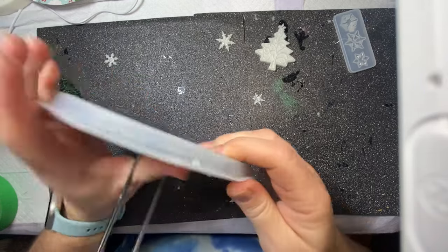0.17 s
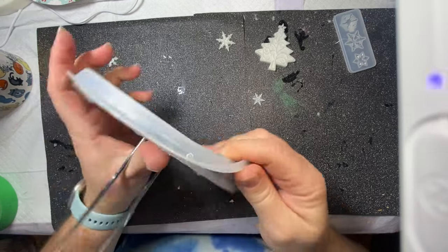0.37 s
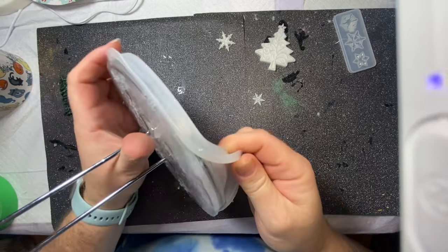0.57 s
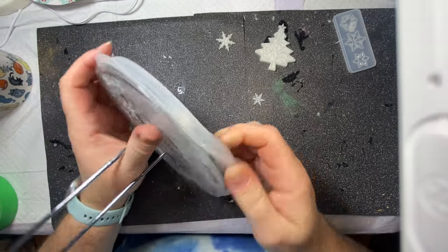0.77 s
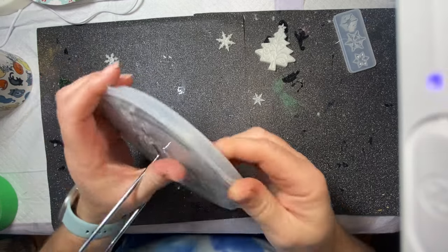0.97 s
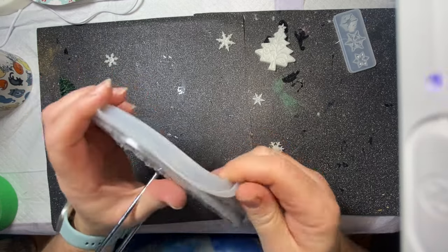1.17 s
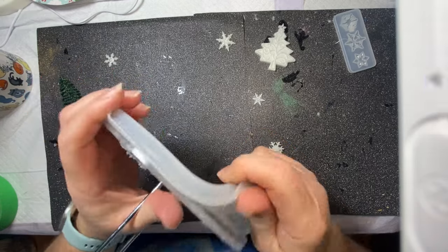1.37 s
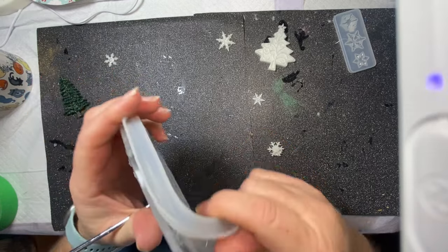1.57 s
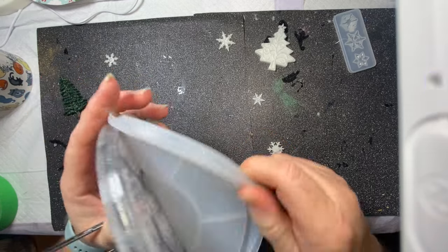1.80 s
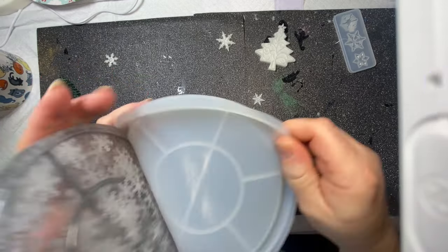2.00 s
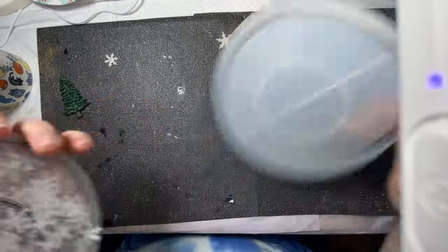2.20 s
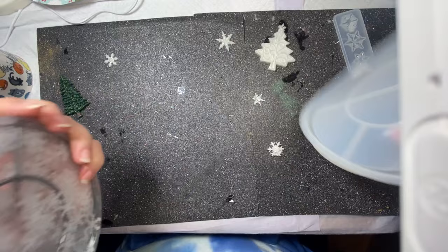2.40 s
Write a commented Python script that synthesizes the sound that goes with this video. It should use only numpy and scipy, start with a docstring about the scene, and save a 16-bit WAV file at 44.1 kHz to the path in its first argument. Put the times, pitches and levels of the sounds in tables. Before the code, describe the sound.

A flexible silicone mold peels off a hard casting, heard close in a quiet, lightly hissing room. Small clicks open, with a sharper crackle at 0.4 s and sparse ticks until a strong snap near 1.04 s. Pops and a short rasp gather at 1.25-1.45 s, thicken from 1.7 s, and peak around 2.04-2.08 s with hollow knocks, fizz and rubbery thuds. Faint ticks remain until about 2.45 s.

```python
"""A silicone mold is bent and peeled off a hard casting, close by in a quiet room.
Its seal lets go in snaps: noise cracks, short sagging rings, a hollow knock and noise through resonances.
Between them the seam fizzes and rasps with random grains; the bending rubber thuds in low noise
and thumps in falling sines. Quick reflections, wall tails, faint hum, rumble and hiss surround it."""
import sys
import numpy as np
from scipy import signal
from scipy.fft import rfft, irfft, next_fast_len
from scipy.io import wavfile
from scipy.ndimage import uniform_filter1d, map_coordinates

SR = 44100
rng = np.random.default_rng(int(sys.argv[2]) if len(sys.argv) > 2 else 0)


def wav_out(sig):
    """Save sig, one row per channel (or a flat mono array), as 16-bit PCM at SR to the path in sys.argv[1]."""
    wavfile.write(sys.argv[1], SR, np.round(np.clip(np.atleast_2d(sig).T, -1, 1) * 32767).astype(np.int16))


N = 108045


def amp(db):
    """Decibels to a linear gain."""
    return 10 ** (np.asarray(db) / 20)


def unit(x):
    """Scale a signal to rms 1."""
    return x / np.sqrt(np.mean(x ** 2) + 1e-20)


def along(points, hz):
    """Read (f/Hz, value) points at any frequency, on a log axis."""
    f, v = np.transpose(points)
    return np.interp(np.log(hz + 1), np.log(f + 1), v)


def curves(rows):
    """One value per sample for each column after the time."""
    s, *cols = np.transpose(rows)
    return [np.interp(np.arange(N) / SR, s, c) for c in cols]


def wobble(rate):
    """A smooth random curve with this many knots a second."""
    knots = rng.standard_normal(int(N * rate / SR) + 4)
    return map_coordinates(knots, [np.arange(N) * rate / SR])


def filtered(x, response):
    """Filter x by a complex response of frequency."""
    m = next_fast_len(N + SR // 2)
    spectrum = rfft(x, m) * response(np.fft.rfftfreq(m, 1 / SR))
    return irfft(spectrum, m)[..., :N]


def coloured(x, spectrum):
    """Shape x by a spectrum closed with -60 dB an octave beyond each end, then set rms 1."""
    below = [(spectrum[0][0] / 2, -60)]
    above = [(spectrum[-1][0] * 2, -60)]
    closed = below + list(spectrum) + above
    return unit(filtered(x, lambda hz: amp(along(closed, hz))))


def glide(t, start_hz, end_hz, fall_s):
    """A sine whose pitch settles exponentially from start to end."""
    pitch_hz = end_hz + (start_hz - end_hz) * np.exp(-t / fall_s)
    return np.sin(2 * np.pi * np.cumsum(pitch_hz) / SR)


def shape(t, rise_s, t60_s):
    """Soft rise, exponential fall of 60 dB in t60."""
    return (1 - np.exp(-t / rise_s)) ** 2 * amp(-60 * t / t60_s)


def grains():
    """Clumps of tiny releases over a smooth hiss: white noise with a grainy level."""
    per_s, spread_db, clump_fall_s = 1500, 4.5, 0.0011
    smooth, wobble_db = 1.1, 3  # steady share beside the clumps; slower level wander
    sizes = (rng.random(N) < per_s / SR) * amp(spread_db * rng.standard_normal(N))
    clumps = unit(signal.lfilter([1], [1, -np.exp(-1 / (clump_fall_s * SR))], sizes))
    return unit((smooth + clumps) * rng.standard_normal(N) * amp(wobble_db * wobble(40.28)))


def walls(x):
    """The room's answer: a noise tail for each port, every frequency dying at its own speed."""
    # decay of the room: (f/Hz, t60/s)
    wall_decay = [(200, .2), (2000, .15), (10000, .1)]
    hz, t, z = signal.stft(rng.standard_normal((2, SR // 3)), SR, nperseg=256)
    decay = amp(-60 * t / along(wall_decay, hz)[:, None])
    tail = signal.istft(z * decay, SR, nperseg=256)[1]
    late = np.pad(x, (200, 0))[None]  # samples before the tail sets in
    return signal.fftconvolve(late, tail / np.linalg.norm(tail[0]), axes=1)[:, :N]


def narrow(hz, width_hz):
    """Noise through a bell-shaped band, rms 1: a fuzzy tone."""
    return unit(filtered(rng.standard_normal(N), lambda f: np.exp(-((f - hz) / width_hz) ** 2)))


def hum():
    """A faint, fuzzy hum that comes and goes, over a steady low room rumble."""
    # loudness of the hum: (t/s, level/dB)
    hum_level = [(.2, -93), (.3, -73.5), (.9, -80.5), (1.05, -93)]
    level_db, = curves(hum_level)
    return amp(level_db) * narrow(272, 42) + amp(-92.5) * narrow(54.6, 17)


def room_air():
    """Coloured room noise: a slightly wavering part common to both ports, a fainter separate one."""
    # spectrum of the room air: (f/Hz, level/dB)
    air_colour = [(15, -36), (25, 12), (288, -5), (687, -75), (2090, -15), (2330, -45), (3150, -33),
                  (3600, -65), (5720, -27), (7920, -24.5), (14800, -13), (16500, -13)]
    common = amp(-72.5 + 0.67 * wobble(26.0)) * coloured(rng.standard_normal(N), air_colour)
    separate = amp(-81) * coloured(rng.standard_normal((2, N)), air_colour)
    return common + separate


def nearby(x):
    """Quick reflections off hands and desk: a new random echo for each port every 30 ms."""
    t60_s, hold_s, low_cut_hz = .012, .03, 2600
    t, hop = np.arange(SR // 40) / SR, round(hold_s * SR)
    wet = np.zeros((2, N + hop + len(t)))
    for at in range(0, N, hop):
        echo = rng.standard_normal((2, len(t))) * amp(-60 * t / t60_s)
        part = signal.fftconvolve(x[None, at:at + hop], echo / np.linalg.norm(echo[0]), axes=1)
        wet[:, at:at + part.shape[1]] += part
    return filtered(wet[:, :N], lambda f: 1j * f / (low_cut_hz + 1j * f))


def flex():
    """The mold thuds low as it bends: coloured noise under a moving level."""
    # loudness of the bending, before a fixed 4 dB cut: (t/s, level/dB)
    flex_level = [(0.0, -69), (0.36, -98), (0.39, -55), (0.5, -82), (1.02, -71.5), (1.05, -46), (1.17, -91),
                  (1.43, -56.5), (1.62, -100), (1.74, -48), (1.77, -72), (1.83, -44), (1.9, -58),
                  (2.03, -51.5), (2.07, -38), (2.45, -87.5)]
    # spectrum of the thud: (f/Hz, level/dB)
    thud_colour = [(15, -26), (25, -11), (64, 2), (161, -3), (198, -13.5), (317, -14), (450, -18.5),
                   (580, -69), (990, -120)]
    level_db, = curves(flex_level)
    return amp(level_db - 4) * coloured(rng.standard_normal(N), thud_colour)


def thumps():
    """Waves running through the bent rubber: short sines that fall in pitch."""
    # single waves: (t/s, level/dB, start f/Hz, end f/Hz)
    waves = [(0.255, -51.5, 387, 264), (0.393, -40, 332, 149), (0.435, -59, 132, 86),
             (1.042, -36, 316, 193), (1.053, -61, 154, 72), (1.271, -56, 297, 172),
             (1.346, -46.5, 323, 163), (1.433, -46, 225, 106.5), (1.726, -36, 328, 199),
             (1.789, -50, 108, 59.6), (1.819, -27.5, 660, 390), (1.824, -39, 212, 127),
             (1.862, -39, 323, 197), (1.947, -33, 590, 454), (1.963, -41, 291, 243), (2.04, -22, 680, 410),
             (2.058, -37, 208, 120), (2.078, -26.5, 533, 326), (2.08, -28.5, 204, 118),
             (2.092, -34, 110, 71.6), (2.149, -39.5, 87, 55.3), (2.218, -50, 320, 78),
             (2.257, -46, 105.5, 68), (2.38, -57.5, 414, 252)]
    fall, rise, t60 = 1.14, 0.15, 10.1  # in cycles of the end pitch
    out, t = np.zeros(N), np.arange(N) / SR
    for s, db, start_hz, end_hz in waves:
        at = round(s * SR)
        after = t[:min(SR // 3, N - at)]
        wave = glide(after, start_hz, end_hz, fall / end_hz)
        wave *= shape(after, rise / end_hz, t60 / end_hz)
        out[at:at + len(after)] += amp(db) * wave
    return out


def rasps():
    """Rubber rasping over the rim: dense grains that swell and fade in one broad resonance."""
    # rasps: (start t/s, loudest t/s, end t/s, level/dB, centre f/Hz)
    # a row whose times are out of order starts or stops abruptly
    strokes = [(0.385, 0.373, 0.48, -46.5, 3900), (0.55, 0.598, 0.64, -61, 2620),
               (0.663, 0.684, 0.67, -62.5, 1910), (0.726, 0.773, 0.79, -55, 2650),
               (1.024, 1.033, 1.117, -47.5, 1880), (1.218, 1.235, 1.317, -53, 2340),
               (1.306, 1.344, 1.348, -54, 2100), (1.388, 1.426, 1.47, -36, 1670),
               (1.567, 1.581, 1.61, -55.5, 1420), (1.66, 1.676, 2, -53.5, 1620),
               (2.327, 2.334, 2.34, -44, 4470)]
    swell_db, width = 26.5, 1.55  # edge to top; bandwidth over centre
    out, t, seam = np.zeros(N), np.arange(N) / SR, grains()
    for start, top, end, db, hz in strokes:
        resonance = lambda f: (1j * f / (hz * hz - f * f + 1j * f * hz * width)) ** 2
        swell = np.interp(t, [start, top, end], [-swell_db, 0, -swell_db], -99, -99)
        out += unit(filtered(seam, resonance)) * amp(db + swell)
    return out


def fizz():
    """The seam fizzes as it opens: grains in a low and a treble colour, balanced over time."""
    # the opening seam: (t/s, fizz level/dB, treble relative to it/dB)
    peel = [(0.0, -68.5, 4.5), (0.19, -78.5, 7), (0.27, -60.5, -0.5), (0.37, -73.5, 10), (0.39, -56.5, -7),
            (0.5, -79, -23), (0.75, -77.5, 8), (1.01, -80, -9), (1.04, -77, 20), (1.15, -79.5, 1.5),
            (1.27, -72.5, 12.5), (1.31, -82.5, -13), (1.42, -52.5, 5.5), (1.53, -84.5, -8),
            (1.69, -59.5, 5.5), (1.83, -53, 1.5), (1.89, -59, 7), (1.93, -41.5, 3), (1.98, -49, 0.5),
            (2.05, -43.5, 1), (2.14, -61.5, -5), (2.15, -46.5, 7.5), (2.17, -64.5, 0), (2.24, -59.5, 5),
            (2.31, -69, -17), (2.32, -79, 12), (2.37, -74, -4.5), (2.45, -67, -3)]
    # spectrum of the body of the fizz: (f/Hz, level/dB)
    fizz_body = [(210, -6), (350, -5.5), (630, -1), (701, -2.5), (1360, -2.5), (2220, -6), (3340, -5.5),
                 (4500, -9.5), (5850, -11), (9900, -120)]
    # spectrum of its treble: (f/Hz, level/dB)
    fizz_treble = [(3000, -57), (4200, -8), (6000, 2.5), (8000, 2.5), (11000, 3), (16000, 7)]
    level_db, treble_db = curves(peel)
    seam = grains()
    return amp(level_db) * (coloured(seam, fizz_body) + amp(treble_db) * coloured(seam, fizz_treble))


def casting(f):
    """Broad resonances of the hard casting in its mold, summed with alternating sign."""
    # resonances: (centre f/Hz, width/Hz, level/dB)
    modes = [(1293, 320, 1), (1750, 120, 6), (2516, 610, 6), (3020, 310, 8), (4000, 940, 4),
             (6400, 920, -1.5)]
    return sum((-1) ** k * amp(db) * 1j * f * w / (c * c - f * f + 1j * f * w)
               for k, (c, w, db) in enumerate(modes))


def snaps():
    """Each release cracks, rings at its own pitch, shakes the casting and knocks the mold's cup."""
    # releases, levels before the fixed offsets of each part below:
    # (t/s, snap level/dB, ring f/Hz, crack relative to snap/dB, ring t60/s, knock relative to snap/dB)
    releases = [(0.031, -36.5, 1153, -39, 0.0084, -42), (0.128, -43.5, 1660, -20, 0.013, -24),
                (0.141, -54, 1760, 3, 0.0078, -10), (0.211, -41, 1140, -9.5, 0.011, -34),
                (0.254, -45.5, 2030, -5, 0.0044, -36), (0.273, -31, 1364, -6, 0.011, -51),
                (0.338, -60, 5880, 11.5, 0.017, -3), (0.389, -27.5, 2900, -5, 0.0088, -11),
                (0.4334, -35.5, 1760, -12, 0.0076, -43), (0.568, -41, 2815, -20.5, 0.015, -30),
                (0.757, -41, 2700, -14, 0.009, -21), (0.77, -39.5, 2630, -16, 0.0085, -20),
                (0.902, -50, 2520, -16, 0.0055, -16.5), (0.929, -51.5, 1700, -13, 0.0076, -10.5),
                (0.976, -45, 2150, -18, 0.0053, -46), (1.028, -40, 1860, -7.5, 0.01, -35),
                (1.04, -26.5, 1643, -9.5, 0.013, -16.5), (1.044, -20, 1880, -16, 0.0036, -24.5),
                (1.108, -39.5, 1860, -13, 0.0054, -15), (1.235, -38, 2860, -15, 0.0075, -24),
                (1.267, -27, 2580, -46, 0.0049, -29), (1.3435, -25.5, 1840, -40.5, 0.0043, -20.5),
                (1.36, -31, 1726, -21, 0.014, -17), (1.411, -37.5, 2370, -30, 0.021, -6),
                (1.422, -23.5, 1828, -43, 0.014, -13), (1.427, -24, 1743, -8.5, 0.011, -18),
                (1.445, -40, 1400, -35, 0.018, -2.5), (1.511, -66.5, 1350, 3, 0.021, 2.5),
                (1.578, -29.5, 1700, -17, 0.0031, -15), (1.681, -25.5, 2575, -12, 0.0071, -14),
                (1.69, -30.5, 1624, -11, 0.013, -14), (1.7, -35.5, 1650, -19, 0.0089, -28),
                (1.7245, -23.5, 1730, -20, 0.009, -8.5), (1.767, -21.5, 1720, -18, 0.0043, -22),
                (1.777, -38, 1550, -6, 0.013, -26), (1.785, -29, 2280, -13, 0.008, -40),
                (1.789, -25.5, 1670, -20.5, 0.0077, -10), (1.8, -36, 1620, -6, 0.0043, -29),
                (1.818, -15.5, 1530, -16.5, 0.009, -8.5), (1.86, -17, 1170, -18, 0.0048, -16.5),
                (1.898, -30.5, 1670, -7, 0.0053, -20), (1.92, -25, 5400, -7, 0.0064, -20.5),
                (1.925, -23, 4900, -6, 0.0069, -8), (1.928, -34, 2140, -15, 0.021, -5),
                (1.946, -28.5, 1415, -5, 0.011, -13), (1.997, -34, 2300, -9, 0.0084, 0.5),
                (2.013, -37, 5540, -15, 0.008, -27.5), (2.032, -29.5, 2470, -7, 0.0091, -29),
                (2.037, -13, 1265, -5, 0.0092, -4), (2.0395, -14.5, 1690, -10, 0.0071, -8.5),
                (2.045, -21.5, 1280, -3, 0.01, -19), (2.057, -26.5, 1460, -5, 0.0061, -23),
                (2.073, -21.5, 1130, -8, 0.0068, -14), (2.077, -16, 2046, -11.5, 0.0077, -20.5),
                (2.0815, -10, 2370, -41, 0.0095, -20.5), (2.088, -24, 2600, -7.5, 0.013, -13),
                (2.143, -31, 1625, -7, 0.013, -10.5), (2.195, -46, 5750, 3.5, 0.024, -26),
                (2.217, -43.5, 1290, -6, 0.007, -6.5), (2.23, -35, 3634, -1.5, 0.016, -38),
                (2.317, -47.5, 4030, 4.5, 0.008, -42), (2.323, -41.5, 5020, -4, 0.0076, -36),
                (2.333, -46, 3840, -12, 0.021, -34), (2.424, -61.5, 1270, 4.5, 0.012, 1)]
    ring_db, ring_rise, ring_sag, ring_sag_s = 4, 0.092, 0.14, 0.001  # rise over t60; share sharp at first
    ring_rough = .4
    crack_db, crack_rise_s, crack_t60_s, crack_low_cut_hz = 22, .0008, .005, 2980
    knock_db, knock_hz, knock_sag, knock_sag_s = 12.5, 614, 0.64, .0025
    knock_rise_s, knock_t60_s = 0.0013, 0.011
    hit_db, hit_t60_s, hit_follows = 2.5, 0.0093, 0.17  # sharper cracks shake the casting more

    t = np.arange(SR // 6) / SR
    cracks, rings, hits = np.zeros((3, N + SR))
    noise = rng.standard_normal((len(releases), 3, len(t)))
    knock = glide(t, knock_hz * (1 + knock_sag), knock_hz, knock_sag_s)
    knock *= shape(t, knock_rise_s, knock_t60_s)
    crack_shape = shape(t, crack_rise_s, crack_t60_s)
    hit_shape = shape(t, crack_rise_s, hit_t60_s)
    for release, (crack_noise, rough_noise, hit_noise) in zip(releases, noise):
        s, db, hz, crack_rel_db, t60_s, knock_rel_db = release
        at = slice(round(s * SR), round(s * SR) + len(t))
        rough = 1 + ring_rough * unit(uniform_filter1d(rough_noise, size=24))
        ring = rough * glide(t, hz * (1 + ring_sag), hz, ring_sag_s) * shape(t, ring_rise * t60_s, t60_s)
        rings[at] += amp(db) * (amp(ring_db) * ring + amp(knock_rel_db + knock_db) * knock)
        cracks[at] += amp(db + crack_rel_db + crack_db) * crack_shape * crack_noise
        hits[at] += amp(db + hit_db + hit_follows * crack_rel_db) * hit_shape * hit_noise
    bright = lambda f: (1j * f / (crack_low_cut_hz + 1j * f)) ** 2
    return rings[:N] + filtered(cracks[:N], bright) + filtered(hits[:N], casting)


def scene():
    """The mold in front, its reflections and the room air around it."""
    mold = snaps() + fizz() + rasps()
    reflections = amp(-6) * nearby(mold) + amp(-15) * walls(mold)
    return mold + flex() + thumps() + hum() + room_air() + reflections


def record(dry):
    """Two ports with their own phase and lean, the capsule's colour; the top is lowered, then cut."""
    # colour of the capsule: (f/Hz, level/dB)
    capsule = [(20, -33), (42, 1.5), (2700, 0), (3500, -4), (4600, 0), (7000, 0), (10000, -3.5),
               (13600, -6), (15500, -11)]
    # balance of the ports: (f/Hz, left over right/dB)
    lean = [(60, 0), (200, -3.5), (380, -8), (620, 2.5), (1290, 0), (2380, -6), (4400, -2), (9000, 0)]
    # phase between the ports: (f/Hz, lead of the left/rad)
    lead = [(100, .15), (860, .6), (1210, -.5), (2670, .9), (3700, .8), (4650, 1.4), (5770, .7),
            (6460, 2.3), (7400, 3.14), (10400, 6.28), (13600, 9.42), (16600, 12.8)]
    edge_hz, edge_db, top_hz = 15900, -26, 16700
    half = np.array([[.5], [-.5]])  # each port takes half the difference

    def response(hz):
        level = amp(along(capsule, hz) + half * along(lean, hz))
        phase = np.exp(1j * half * along(lead, hz))
        return level * phase * np.where(hz > edge_hz, amp(edge_db), 1) * (hz < top_hz)

    return filtered(dry, response)


dry = scene()
out = record(dry)
wav_out(out)
```